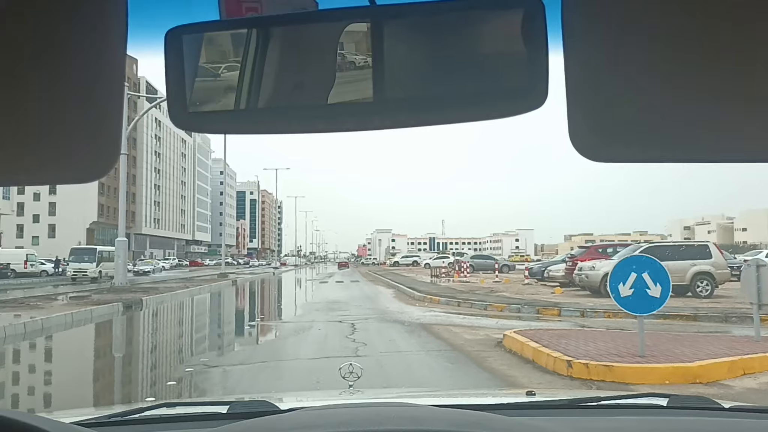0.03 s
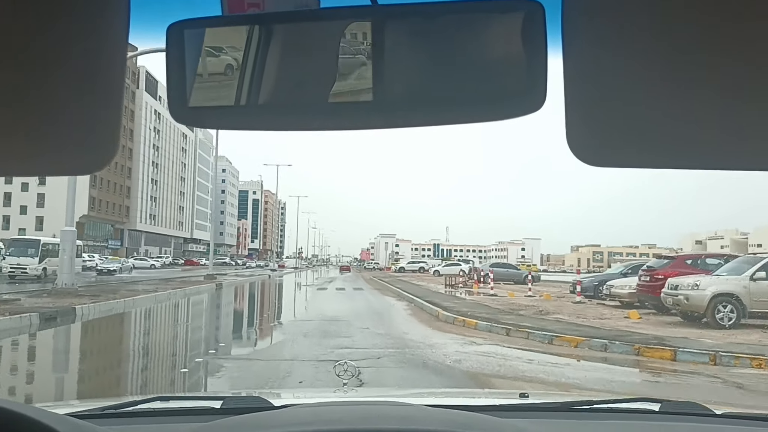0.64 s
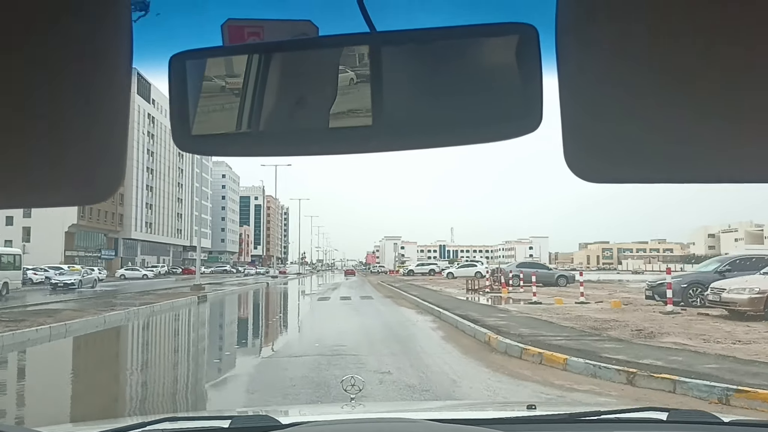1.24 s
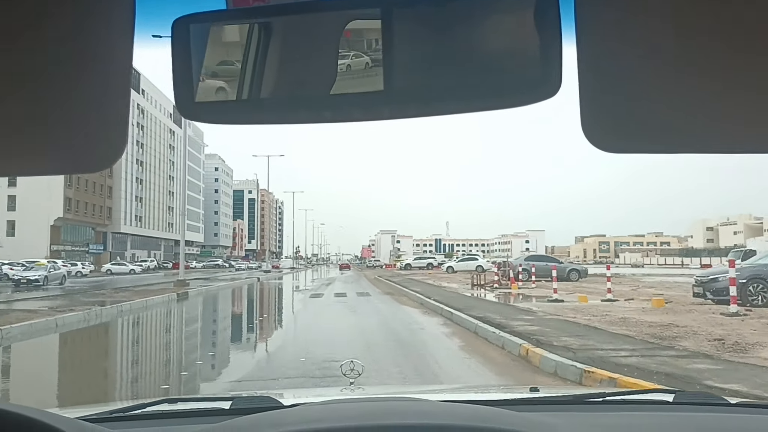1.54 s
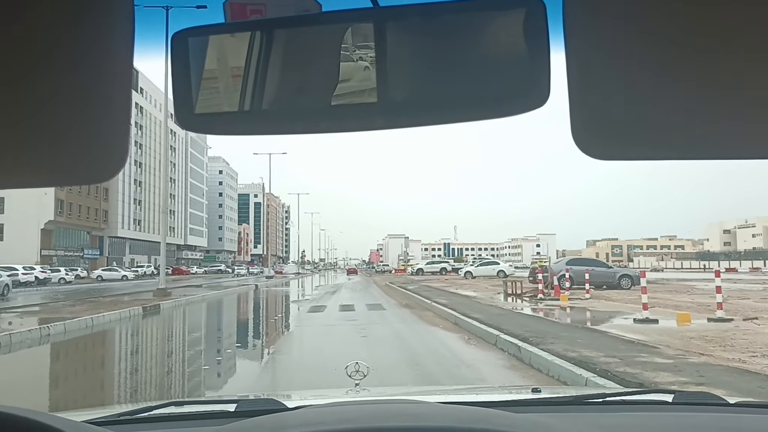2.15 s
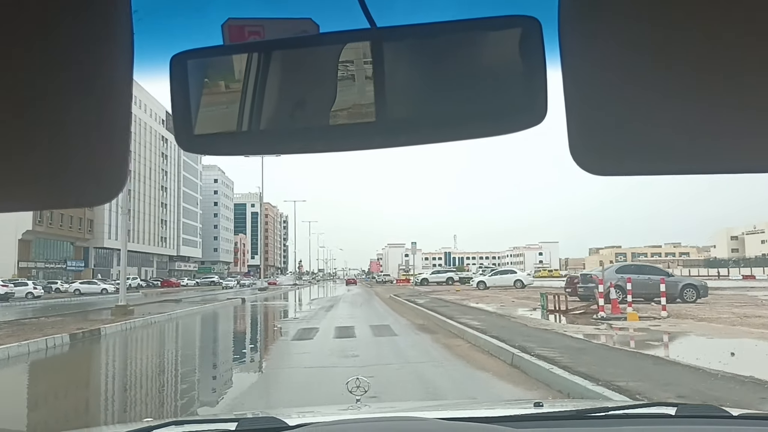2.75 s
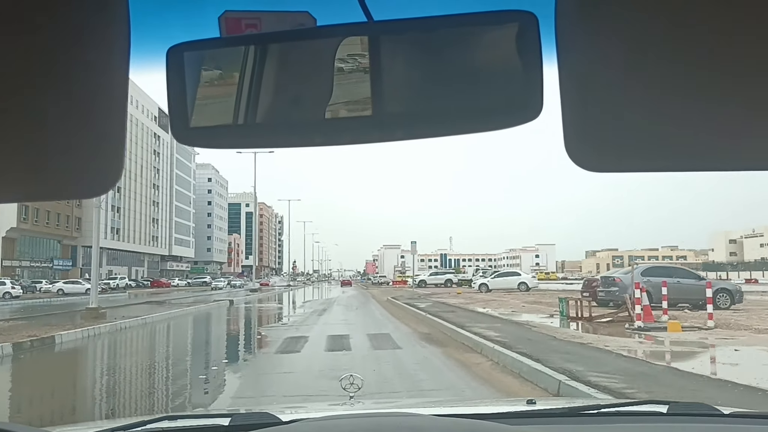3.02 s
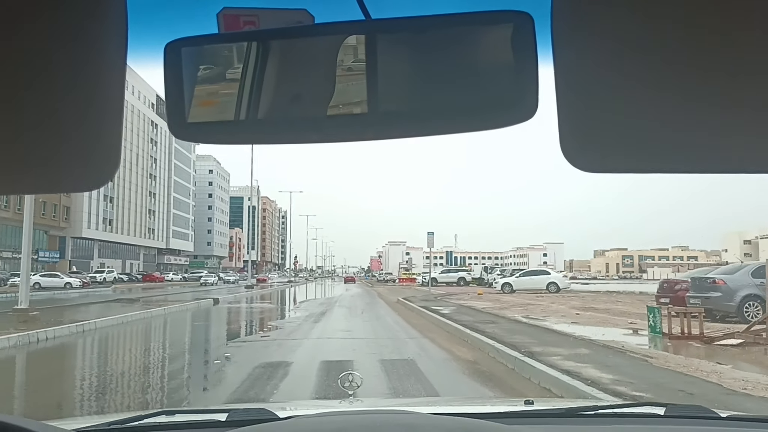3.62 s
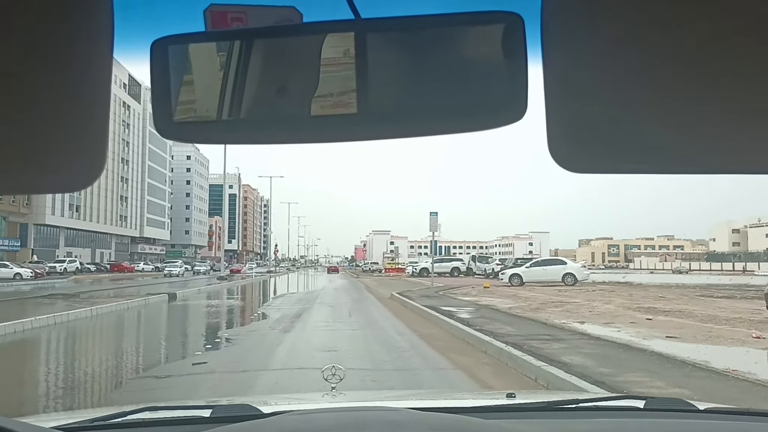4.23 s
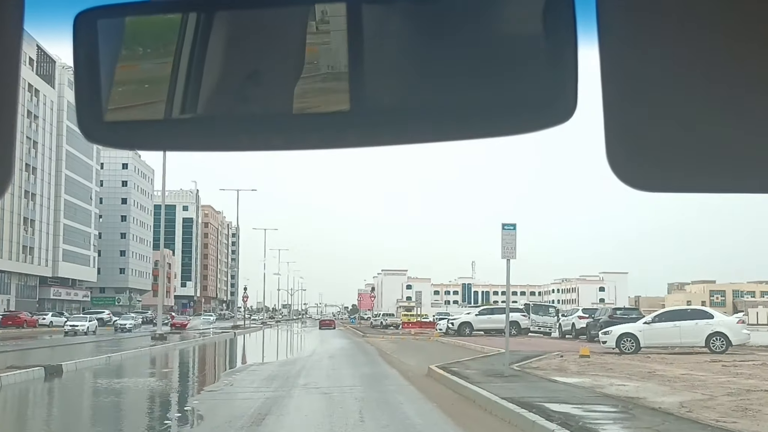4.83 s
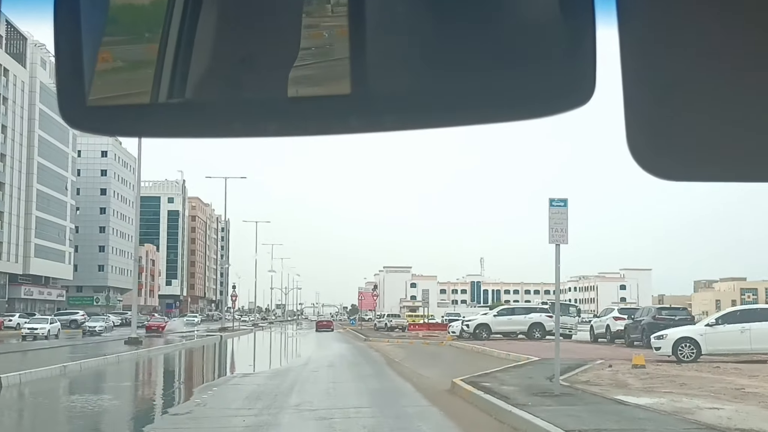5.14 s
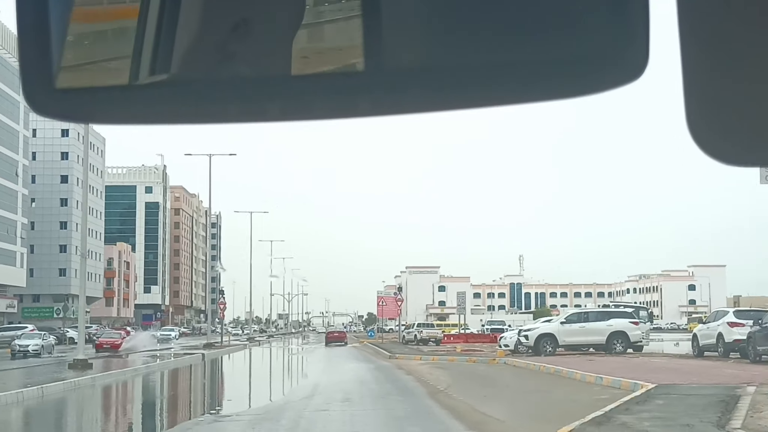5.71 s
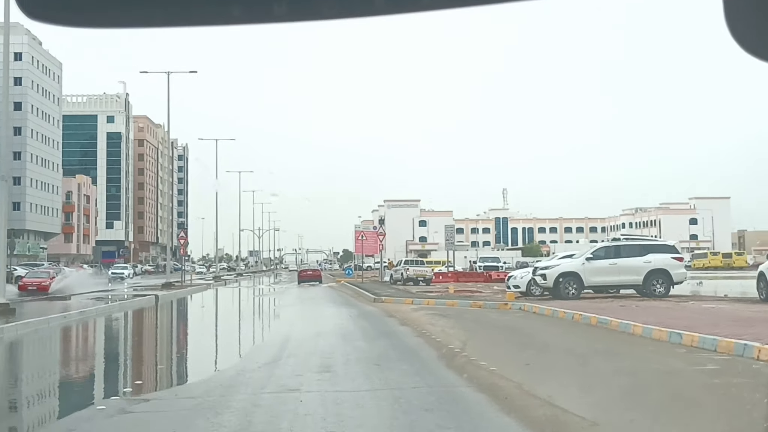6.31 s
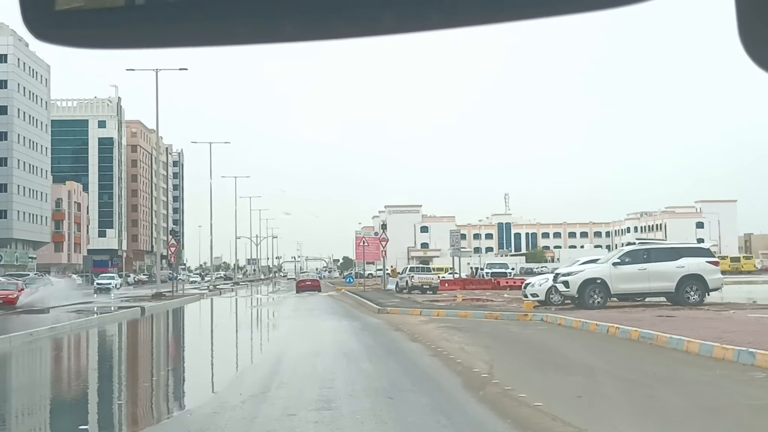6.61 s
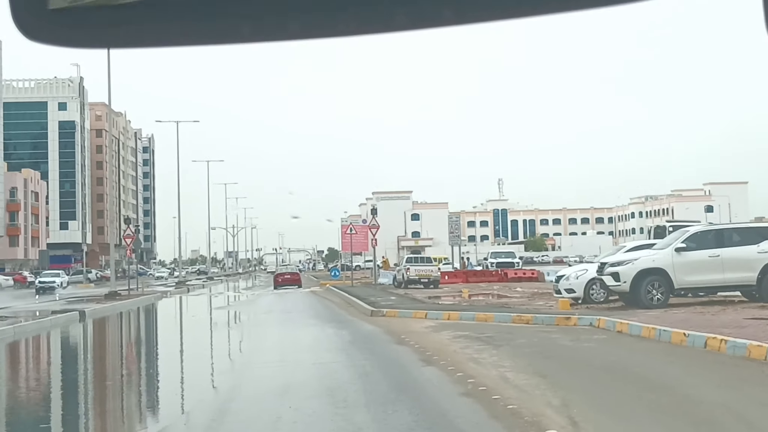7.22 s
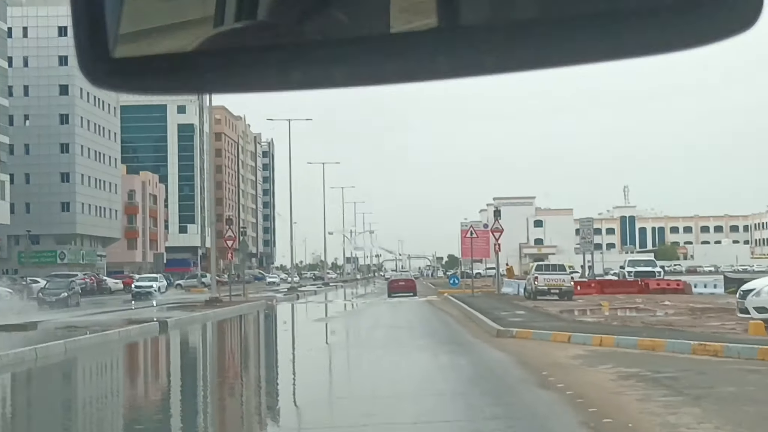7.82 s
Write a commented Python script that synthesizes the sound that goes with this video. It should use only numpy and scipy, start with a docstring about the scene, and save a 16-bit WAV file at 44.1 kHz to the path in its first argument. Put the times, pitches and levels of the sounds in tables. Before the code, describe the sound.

A hand-held phone behind the windscreen picks up deep, uneven road rumble and the softer hiss of tyres on water. A few finger knocks and a brief swishing rub come on the left before halfway. One press of the accelerator raises the engine hum, with faint drops ticking on the glass. As the hum falls back, there is more handling noise and two sharp plastic clacks.

```python
"""Inside a car on a wet street, heard from a hand-held phone behind the windscreen.
From the start, bumps make the cabin boom, tyres roar and hiss on the water, and fingers rub the phone.
Between 3 and 4 s fingers knock by the left microphone, and a short swishing rub starts sharply and fades.
Then one press of the accelerator swells the engine, and drops tick on the glass.
From about 7 s the engine fades, the fingers knock and rub again, and something plastic clacks twice."""
import sys
import numpy as np
from scipy import signal
from scipy.fft import rfft, irfft, next_fast_len
from scipy.io import wavfile
from scipy.ndimage import uniform_filter1d

SR = 44100
rng = np.random.default_rng(int(sys.argv[2]) if len(sys.argv) > 2 else 0)


def output_pcm(signal):
    """Save a mono or channel-first signal as 16-bit PCM at the path in sys.argv[1].

    Samples are clipped to [-1, 1] before scaling.
    """
    pcm = np.clip(np.atleast_2d(signal).T, -1, 1) * 32767
    wavfile.write(sys.argv[1], SR, np.round(pcm).astype(np.int16))


N = 355446
T = np.arange(N) / SR

# Levels in a table compare its rows; the functions may turn the whole sound up or down.
# how hard the road shakes the car: time_s, boom_db, rumble_db
ROAD_SHAKE = [(0.1, -38, -33), (0.8, -29, -32), (1.4, -29, -31.5), (1.6, -24.5, -30.5), (2.1, -27.5, -27.5),
              (2.55, -34.5, -31.5), (3.0, -31, -30), (4.15, -28.5, -31), (4.6, -26.5, -29.5),
              (5.1, -31, -29.5), (5.65, -27, -31), (6.5, -27, -30), (7.2, -27, -33), (8.06, -38.5, -31)]
# bumps that set the cabin booming: start_s, length_s, level_db
ROAD_BUMPS = [(0.172, 0.045, -17), (0.70, 0.014, -17), (0.87, 0.11, -24), (1.14, 0.086, -22),
              (1.61, 0.057, -17.5), (1.71, 0.17, -18.5), (1.967, 0.069, -17), (2.14, 0.022, -21),
              (2.24, 0.021, -15), (2.335, 0.081, -22), (2.49, 0.039, -18.5), (2.725, 0.019, -18),
              (3.685, 0.089, -20), (3.787, 0.029, -19), (3.856, 0.12, -20.5), (3.986, 0.1, -20),
              (4.307, 0.12, -21), (4.41, 0.047, -23), (4.811, 0.023, -15), (4.964, 0.054, -19),
              (5.217, 0.13, -16.5), (5.372, 0.05, -20.5), (5.526, 0.051, -19), (5.766, 0.059, -16.5),
              (5.915, 0.093, -21.5), (6.053, 0.06, -18.5), (6.41, 0.12, -16), (6.572, 0.14, -17),
              (6.934, 0.072, -17), (7.164, 0.1, -16.5), (7.55, 0.095, -16), (7.83, 0.034, -21)]
# sharper edges that thud through the panels: start_s, length_s, level_db
ROAD_EDGES = [(.105, 0.033, -28.5), (.375, 0.023, -27), (1.15, 0.014, -23.5), (1.476, 0.033, -27),
              (1.536, 0.033, -25.5), (1.612, 0.079, -24), (1.714, 0.092, -23), (1.947, 0.037, -24.5),
              (2.139, 0.051, -28), (2.236, 0.072, -28), (4.43, 0.068, -25), (4.938, .04, -27.5),
              (5.008, 0.033, -28)]
# tone (strength at each pitch) of the boom, the rumble and the thuds: pitch_hz, level_db
BOOM_TONE = [(20, -18), (28, -8), (38, 0), (50, -7), (60, -17), (80, -36)]
RUMBLE_TONE = [(40, -48), (62, 3.5), (80, -1.5), (102, 0.5), (150, -4.5), (180, -8), (245, -8.5),
               (300, -24), (500, -36), (1000, -83)]
THUD_TONE = [(45, -12), (70, 6), (120, 7.5), (160, -12.5), (220, -9.5), (300, -18.5)]

# how fast the engine fires: time_s, firing_hz
FIRING_RATE = [(4.2, 80), (4.7, 84.85), (5.0, 87.34), (5.2, 94), (5.45, 95.9), (5.8, 95.5), (6.3, 91.6),
               (6.8, 85.1), (7.2, 79.9)]
# how well the cabin lets the engine through: pitch_hz, gain_db
ENGINE_TO_CABIN = [(80, -13), (96, -1.5), (170, -16), (190, .5), (215, -8), (240, -7), (258, -2),
                   (277, 1.5), (286, -7), (340, -15), (362, -7), (384, -1.5), (430, -16), (480, -10.5)]

# water on the road, as the strength of the spray: time_s, level_db
ROAD_WATER = [(0.25, -53.5), (0.77, -54), (1.26, -56), (2.6, -55), (3.25, -53.5), (4.1, -55), (4.83, -57.5),
              (5.18, -56), (6.4, -58), (6.62, -59.5), (6.85, -58), (7.5, -57.5)]
# tone of the tyres' roar and of their spray: pitch_hz, level_db
ROAR_TONE = [(180, -36), (300, 0), (390, 3), (510, -6.5), (640, -5.5), (850, -7.5), (1250, -20),
             (1600, -14.5), (2400, -46), (4000, -28.5), (8000, -46)]
SPRAY_TONE = [(600, -7.5), (1200, 6.5), (1700, 7), (2400, 4), (3200, 2.5), (4200, 1), (5000, -3),
              (6700, -2.5), (8400, -9), (10500, -11), (13000, -13.5), (16000, -23)]
# narrow bands where the tread sings: pitch_hz, width_hz, level_db
TREAD_NOTES = [(630, 120, -1), (750, 130, -1), (880, 130, 1.2), (1040, 110, -1.5), (1565, 130, -.3),
               (1680, 130, -7.5), (1860, 200, -5.5), (2110, 160, -8), (2400, 170, -8.5)]

# finger knocks, each with the ring of the spot it hits: start_s, level_db, spot_hz, spot_gain_db
FINGER_KNOCKS = [(3.3615, -47, 700, 1), (3.3657, -14, 1060, -22), (3.606, -31, 2100, 19),
                 (3.6076, -18.5, 1880, 6), (3.6088, -27, 440, 18.5), (3.9929, -17.5, 1880, -2),
                 (4.0026, -11.5, 1700, -3.5), (6.9568, -28.5, 1430, 7.5), (7.3155, -7.5, 2890, -10)]
# notes of the phone's case (ring_s is the time to fade by 60 dB): pitch_hz, level_db, ring_s
CASE_NOTES = [(232, -4.5, 0.026), (376, -5.5, 0.028), (640, 0, 0.0062), (1092, -4.5, 0.015),
              (1480, -11, 0.0092), (2280, -13, 0.0071), (3760, -14.5, 0.01), (7400, -10, 0.002)]
# finger rubs: peak_s, level_db, rise_s, hold_s, fade_s, bass_db, lean_left_db, scrape_hz
FINGER_RUBS = [(0.113, -42.5, 0.076, .025, 0.046, -2, 28, 2430),
               (1.453, -38, .0018, .002, .002, -9, 16, 5340),
               (2.314, -33.5, 0.0011, 0.0058, 0.0039, -17, 22, 6870),
               (3.615, -38.5, .003, 0.018, 0.016, 18, 20, 704),
               (3.744, -38.5, 0.0017, 0.027, 0.0065, -12, 8.5, 6800),
               (6.794, -32, 0.0052, 0.0011, .0064, 5, 32, 6500),
               (6.958, -38, .001, 0.0074, .002, -22, 27, 6800),
               (6.996, -53, .002, .006, .005, -18, 20, 6500),
               (7.466, -39.5, 0.0044, 0.0064, 0.0083, 2, 14, 6300),
               (7.768, -46.5, .002, 0.015, 0.028, -24, 17.5, 5460),
               (7.815, -31.5, 0.029, 0.011, 0.014, 5, 26, 810),
               (7.8228, -20.5, 0.0022, 0.0061, .001, 6, 38, 1030)]
# tone of a finger rub: pitch_hz, level_db
RUB_TONE = [(300, 8.5), (700, 3.5), (1050, 7), (1500, 8.5), (2200, 7), (3300, 3), (5000, 1), (6800, -0.5),
            (8500, -2.5), (11000, -6.5), (16000, -11)]
# skin snapping free at the end of a rub: start_s, level_db
SKIN_SNAPS = [(6.7967, -7), (7.829, -11.5), (7.8308, -8.5)]
# the phone shifting in the hand: start_s, length_s, level_db, pitch_hz
GRIP_SHIFTS = [(3.626, .012, -40, 400), (3.634, .008, -41, 720), (3.741, .02, -35.5, 400),
               (3.828, .016, -40.5, 560)]

# a short swishing rub, then two plastic clacks: start_s, level_db, fade_s, tilt_db_per_octave
SWISH_AND_CLACKS = [(3.602, -34.5, 0.3, 6), (7.5639, -23, 0.22, 1), (7.6632, -25, 0.18, -5.5)]
# tone of the swish and the clacks before their tilt: pitch_hz, level_db
SWISH_AND_CLACK_TONE = [(300, -5), (800, -6), (1400, -3), (2200, 4), (3000, -1), (4200, 2), (6500, -6),
                        (8500, -14.5), (12300, -13), (13500, -25), (16000, -42)]
# the loose part landing after a clack: start_s, level_db
PART_LANDINGS = [(7.568, -31), (7.5855, -22.5), (7.667, -27)]
# notes that part rings with: pitch_hz, level_db, ring_s
PART_NOTES = [(947, -12, .1), (1278, -18.5, .4), (1305, -9, .09), (1345, -13, .08), (1560, -13, .08),
              (1900, -13, .1), (2185, -12, .1), (2410, -14, .1), (4260, -24, .22), (4425, -29, .22),
              (4638, -26.5, .22)]

# drops on the glass: start_s, level_db
WATER_DROPS = [(0.448, -31), (4.4737, -28), (4.964, -33), (5.608, -47), (5.7005, -34), (5.813, -46.5),
               (6.2976, -51), (6.427, -49), (6.487, -33), (6.6728, -46.5), (7.1132, -37), (7.174, -51),
               (7.366, -42)]
# tone of a drop: pitch_hz, level_db
DROP_TONE = [(1000, -31), (3000, 2), (4800, -0.5), (5700, 2), (6800, 9.5), (8500, 5), (11000, -0.5),
             (13000, -8), (16000, -25)]
# pitches the glass boosts or weakens: pitch_hz, width_hz, gain_db
GLASS_BANDS = [(3900, 500, 4), (5800, 450, 7), (6500, 600, -7), (7400, 600, 5), (8500, 400, 2),
               (11000, 500, 3)]

# how much echoes in the cabin ripple the tone: pitch_hz, depth_db
CABIN_RIPPLE = [(280, 0), (700, 1.8), (2500, 2.2), (6000, 1.8), (12000, 1.3)]
# how alike the two microphones sound: pitch_hz, likeness_0_to_1
STEREO_LIKENESS = [(30, .99), (90, .98), (180, .93), (350, .87), (700, .55), (1500, .25), (6000, .25),
                   (14000, .2)]
# how much louder the left side is: pitch_hz, left_minus_right_db
STEREO_BALANCE = [(30, 4.3), (100, 4.8), (350, 5), (700, 5.5), (1400, 4), (2400, 2.5), (3300, 5), (4500, 2),
                  (8000, 1.5), (14000, 1)]
# pitches each microphone's opening boosts or weakens: pitch_hz, width_hz, gain_db
LEFT_MIC_BANDS = [(6720, 2100, 5.5), (9830, 7700, -4.5)]
RIGHT_MIC_BANDS = [(6500, 2600, -1), (10700, 1430, 9.5)]
LEFT_LAG_S = .001   # the car's sound reaches the left microphone this much later


def car_body(panel_hz=103.4, panel_width_hz=8):
    """The road makes the cabin air boom and the panels rumble, most at bumps; one panel drones."""
    rolling_db, rumble_db = in_time(ROAD_SHAKE)
    bumps = jolts(ROAD_BUMPS, attack_s=.028, release_s=.038)
    edges = jolts(ROAD_EDGES, attack_s=.0128, release_s=.032)
    boom_level = np.maximum(from_db(rolling_db + 5 * drift(13)), bumps)
    rumble_level = np.hypot(from_db(rumble_db + 2 * drift(14)), from_db(-18) * bumps)
    drone = unit_power(resonance(rng.standard_normal(N), panel_hz, panel_width_hz))
    drone = drone * pan(at_hz(STEREO_BALANCE, panel_hz))
    rumble = steadied(cabin_noise(RUMBLE_TONE) + from_db(-11) * drone, samples=3500)
    boom = steadied(cabin_noise(BOOM_TONE), samples=3200)
    thud = steadied(cabin_noise(THUD_TONE), samples=2000)
    return boom_level * boom + rumble_level * rumble + edges * thud


def engine(idle_db=-51, full_load_db=-31.7, flutter_db=.8, half_step_db=-7, roughness=.42):
    """Firings hum at multiples of their rate, with weaker notes between; the cabin favours some."""
    firing_hz, = in_time(FIRING_RATE)
    level_db = idle_db + (full_load_db - idle_db) * engine_load()
    firing_phase = 2 * np.pi * np.cumsum(firing_hz * (1 + .009 * drift(30))) / SR
    hum = 0
    for multiple in 1 + np.arange(9) / 2:
        note_db = level_db + at_hz(ENGINE_TO_CABIN, multiple * firing_hz)
        note_db = note_db + flutter_db * drift(9.9) + half_step_db * (multiple % 1 > 0)
        phase = multiple * firing_phase + rng.uniform(0, 2 * np.pi)
        # uneven firings roughen each note
        rough = roughness * (drift(60) * np.sin(phase) + drift(60) * np.cos(phase))
        hum = hum + from_db(note_db - 2) * (np.sin(phase) + rough)
    late_hum = np.interp(T - LEFT_LAG_S, T, hum)
    return np.array([late_hum, hum]) * pan(5)


def engine_load(press_s=4.09, attack_s=.68, ease_per_s=.34):
    """How hard the engine pulls, 0 to 1: the accelerator is pressed, eased off and let go."""
    easing = np.clip(1 - ease_per_s * (T - press_s - attack_s), 0, 1)
    return swell(press_s, attack_s, hold_s=2.34, release_s=.4) * easing


def tyres(load_boost_db=2.5, waver_db=2.3):
    """The tread roars, more when the engine pulls; water makes it sing and is thrown off hissing."""
    water_db, = in_time(ROAD_WATER)
    roar = from_db(-43 + load_boost_db * engine_load() + 2.45 * drift(20)) * cabin_noise(ROAR_TONE)
    spray = from_db(water_db + 5.5 + 1.13 * drift(20)) * cabin_noise(SPRAY_TONE)
    noise = rng.standard_normal((2, N))
    singing = sum(unit_power(steep_resonance(noise, hz, width_hz)) * from_db(db + waver_db * drift(15))
                  for hz, width_hz, db in TREAD_NOTES)
    singing_db = -60.7 + 2.7 * (water_db - water_db.mean())
    return roar + spray + singing * from_db(singing_db) * pan(3.9)


def finger_knocks(thump_growth=3.6):
    """A fingertip hits the phone: the whole phone thumps, and the case and the struck spot ring."""
    times, level_db = np.transpose(FINGER_KNOCKS)[:2]
    uneven_db = rng.normal(0, 2, (len(times), len(CASE_NOTES))).T
    case = sum(ring(clicks(times, level_db + db + chance_db), hz, ring_s)
               for (hz, db, ring_s), chance_db in zip(CASE_NOTES, uneven_db))
    thump_db = 2 + thump_growth * (level_db - level_db.max())   # light knocks barely thump
    thump = ring(clicks(times, thump_db), hz=84.4, ring_s=.052)
    spots = sum(ring(clicks([start_s], db + spot_db), hz, ring_s=.011)
                for start_s, db, hz, spot_db in FINGER_KNOCKS)
    # the soft fingertip dulls the blow
    return band(thump + case + spots, 44, 2060) * pan(24.7) * from_db(-12.5)


def finger_rubs():
    """Skin drags over the case in tiny slips that swell, hold and stop; sometimes it snaps free."""
    out = np.zeros((2, N))
    for peak_s, db, rise_s, hold_s, fade_s, bass_db, left_db, scrape_hz in FINGER_RUBS:
        t, slips = grainy_noise(RUB_TONE, bass_db=bass_db, scrape_hz=scrape_hz)
        lead_s = min(peak_s, .15)
        rising, fading = (t - lead_s) / rise_s, (lead_s + hold_s - t) / fade_s
        stroke = np.exp(np.minimum(np.minimum(rising, fading), 0))
        add(out, from_db([[db + 3.5], [db + 4 - left_db]]) * stroke * slips, peak_s - lead_s)
    # a snap is one short pulse, rounded by the skin
    rounding = signal.butter(4, 11500, fs=SR, output="sos")
    snaps = signal.sosfilt(rounding, clicks(*np.transpose(SKIN_SNAPS)) + 1e-18)
    return out + band(snaps, 1500, 8800) * pan(42.2) * from_db(-7.5)


def swish_and_clacks(attack_s=.0018, treble_from_hz=1600, treble_life=.7, chatter_db=.5):
    """A swishing rub and two plastic clacks start sharply and fade; a loose part lands and rings."""
    out = np.zeros((2, N))
    low_pass = signal.butter(2, treble_from_hz, fs=SR, output="sos")
    for start_s, db, fade_s, tilt_db in SWISH_AND_CLACKS:
        t, grit = grainy_noise(SWISH_AND_CLACK_TONE, tilt_db=tilt_db)
        grit = unit_power(grit * from_db(chatter_db * drift(690)[:len(t)]))
        low = signal.sosfiltfilt(low_pass, grit)
        fade = np.exp(-np.log(1000) * t / fade_s)
        burst = low * fade + (grit - low) * fade ** (1 / treble_life)   # the treble dies first
        add(out, from_db(db) * (1 - np.exp(-t / attack_s)) * burst, start_s)
    times, level_db = np.transpose(PART_LANDINGS)
    rings = sum(ring(clicks(times, level_db + db), hz, ring_s) for hz, db, ring_s in PART_NOTES)
    rings = band(rings, 600, 12000)   # the rings keep clear of the bass
    return out * pan(1.3) + rings * (1 + .5 * drift(160)) * pan(7)


def drops(droplets_from_s=4.5, droplets_per_s=9, tick_s=.0013, scatter_s=.0071, spatter_after_s=.013):
    """Drops tick, echo off glass and dashboard, and spatter back; fine droplets join in later."""
    out = np.zeros((2, N))
    count = int(droplets_per_s * (T[-1] - droplets_from_s))
    droplets = zip(rng.uniform(droplets_from_s, T[-1], count), rng.normal(-56, 2.5, count))
    for start_s, db in WATER_DROPS + list(droplets):
        t, splash = grainy_noise(DROP_TONE, samples=4096)
        tick = np.exp(-t / tick_s) * pan(-22) * from_db(-7.5)
        arriving = 1 - np.exp(-(t / .0018) ** 2)
        spatter = from_db(-23) * (t > spatter_after_s) * np.exp(-(t - spatter_after_s) / .0072)
        scatter = (np.exp(-t / scatter_s) * arriving + spatter) * pan(7.5)
        add(out, from_db(db - 6) * (tick + scatter) * splash, start_s)
    return coloured(out, GLASS_BANDS)


def grip_shifts(width_hz=170):
    """The case judders briefly against the fingers, close to the left microphone."""
    out = 0
    for start_s, length_s, db, hz in GRIP_SHIFTS:
        judder = steadied(steep_resonance(rng.standard_normal((1, N)), hz, width_hz), samples=600)
        out = out + from_db(db) * swell(start_s, .003, length_s, .006) * judder
    return out * from_db([[0], [-18]])


def cabin_noise(tone):
    """Stereo noise filling the cabin; the part both microphones share reaches the left one later."""
    size = next_fast_len(N, True)
    hz = np.arange(size // 2 + 1) * SR / size
    white = rfft(rng.standard_normal((3, size)))
    alike = at_hz(STEREO_LIKENESS, hz)
    shared = white[2] * np.exp(-2j * np.pi * hz * np.array([[LEFT_LAG_S], [0]]))
    noise = np.sqrt(alike) * shared + np.sqrt(1 - alike) * white[:2]
    # the tone falls away below hearing and above its last row
    roll_off = hz ** 2 / (hz ** 2 + 15 ** 2) / np.maximum(hz / tone[-1][0], 1) ** 3
    colour = from_db(at_hz(tone, hz) + cabin_ripple_db(hz)) * roll_off
    return unit_power(irfft(noise * colour * pan(at_hz(STEREO_BALANCE, hz)), size)[:, :N])


def cabin_ripple_db(hz):
    """Echoes in the cabin boost some pitches and weaken others, differently at each microphone."""
    points_hz = np.arange(0, SR / 2, 28)
    sides = rng.standard_normal((2, len(points_hz)))
    return np.array([np.interp(hz, points_hz, side) for side in sides]) * at_hz(CABIN_RIPPLE, hz)


def grainy_noise(tone, tilt_db=0, bass_db=0, scrape_hz=None, samples=16384, scrape_db=8, octaves=.29):
    """Sample times and a short gritty stereo noise, with a peak at scrape_hz if one is given."""
    hz = np.maximum(np.arange(samples // 2 + 1) * SR / samples, 1)
    grains = rng.laplace(0, 1, (2, samples))
    colour_db = at_hz(tone, hz) + tilt_db * np.log2(np.maximum(hz, 800))
    colour_db += bass_db / (1 + (hz / 3500) ** 2)
    if scrape_hz:
        colour_db += scrape_db * np.exp(-(np.log2(hz / scrape_hz) / octaves) ** 2)
    return np.arange(samples) / SR, unit_power(irfft(rfft(grains) * from_db(colour_db)))


def jolts(rows, attack_s, release_s):
    """Loudness of a series of jolts, each a short rise, hold and fall."""
    return np.max([from_db(db) * swell(start_s - attack_s / 2, attack_s, length_s - attack_s, release_s)
                   for start_s, length_s, db in rows], axis=0)


def swell(start_s, attack_s, hold_s, release_s):
    """Rise straight to 1, hold, and fall straight to 0."""
    falling = 1 - (T - start_s - attack_s - hold_s) / release_s
    return np.clip(np.minimum((T - start_s) / attack_s, falling), 0, 1)


def drift(turns_per_s):
    """A random wander around zero, about 1 in size."""
    points = rng.standard_normal(1000)
    return np.interp(T * turns_per_s, np.arange(len(points)), points)


def clicks(times, levels_db):
    """One click for each contact."""
    out = np.zeros(N)
    out[(np.asarray(times) * SR).astype(int)] = from_db(levels_db)
    return out


def ring(hits, hz, ring_s):
    """Each click starts a pure note that fades by 60 dB in ring_s."""
    decay, angle = from_db(-60 / (ring_s * SR)), 2 * np.pi * hz / SR
    return signal.lfilter([0, np.sin(angle)], [1, -2 * decay * np.cos(angle), decay ** 2], hits + 1e-18)


def resonance(x, hz, width_hz):
    """Keep the pitches near hz."""
    return signal.lfilter(*signal.iirpeak(hz, hz / width_hz, fs=SR), x + 1e-18)


def steep_resonance(x, hz, width_hz):
    """The same resonance twice, so less gets past its edges."""
    return resonance(resonance(x, hz, width_hz), hz, width_hz)


def band(x, low_hz, high_hz):
    """Gently weaken the pitches outside a range."""
    return signal.sosfilt(signal.butter(1, [low_hz, high_hz], "band", fs=SR, output="sos"), x + 1e-18)


def coloured(x, bands):
    """Boost or weaken each band in turn."""
    for hz, width_hz, db in bands:
        x = x + (from_db(db) - 1) * resonance(x, hz, width_hz)
    return x


def steadied(x, samples):
    """Take the slow chance swells out of a noise."""
    return x / np.sqrt(uniform_filter1d(np.mean(x ** 2, axis=0), samples) + 1e-9)


def unit_power(x):
    """Scale to an average power of 1."""
    return x / np.sqrt(np.mean(x ** 2) + 1e-20)


def from_db(db):
    """Turn decibels into a multiplier."""
    return 10 ** (np.asarray(db) / 20)


def pan(left_db):
    """Left and right multipliers that make the left louder by left_db."""
    return from_db(np.array([[.5], [-.5]]) * left_db)


def in_time(rows):
    """Join a table's rows into one curve over time for each value column."""
    times, *columns = np.transpose(rows)
    return [np.interp(T, times, column) for column in columns]


def at_hz(rows, hz):
    """Read a table at any pitch, with octaves evenly spaced."""
    pitches, values = np.transpose(rows)
    return np.interp(np.log(np.maximum(hz, 1)), np.log(pitches), values)


def add(out, sound, start_s):
    """Mix a short sound in at start_s."""
    first = max(int(start_s * SR), 0)
    out[:, first:first + sound.shape[1]] += sound[:, :N - first]


def scene():
    """The moving car and the small sounds inside it."""
    car = car_body() + engine() + tyres()
    return car + finger_knocks() + grip_shifts() + finger_rubs() + drops() + swish_and_clacks()


def record(dry, opens_s=.068, stop_hz=16800):
    """Each microphone colours the sound; the phone opens after a moment and cuts the highest treble."""
    heard = np.array([coloured(dry[0], LEFT_MIC_BANDS), coloured(dry[1], RIGHT_MIC_BANDS)])
    treble_cut = signal.cheby2(16, 60, stop_hz, fs=SR, output="sos")
    return signal.sosfilt(treble_cut, heard * (T >= opens_s))


dry = scene()
out = record(dry)
output_pcm(out)
```